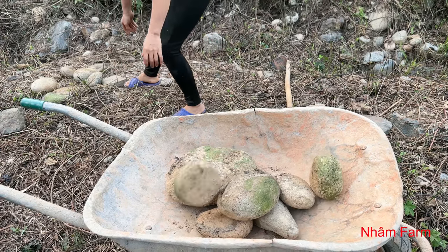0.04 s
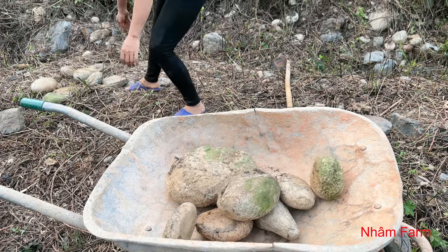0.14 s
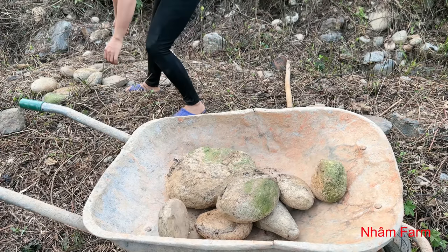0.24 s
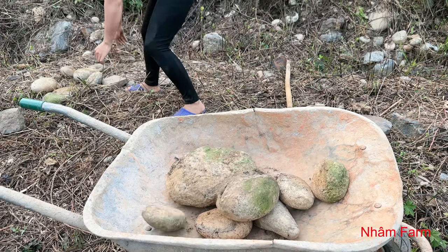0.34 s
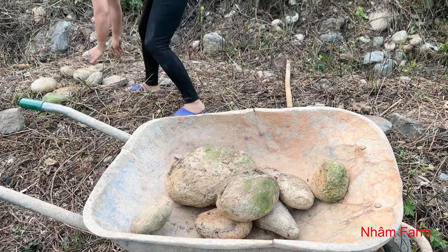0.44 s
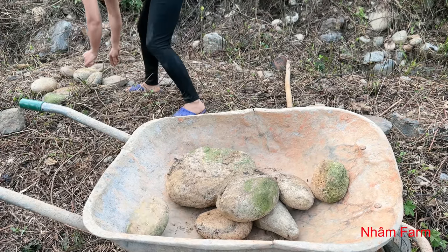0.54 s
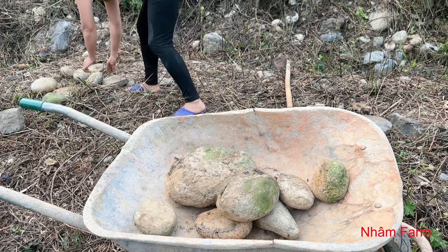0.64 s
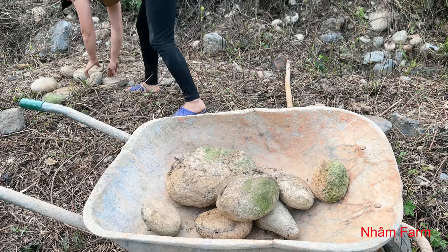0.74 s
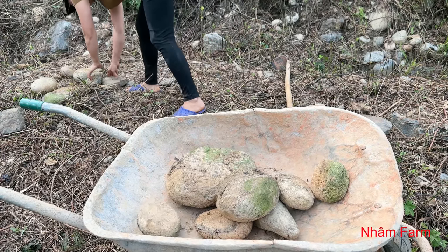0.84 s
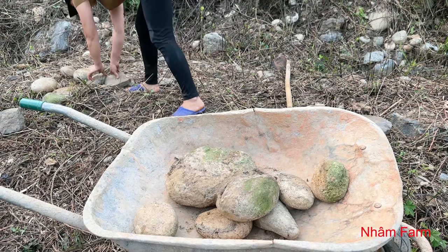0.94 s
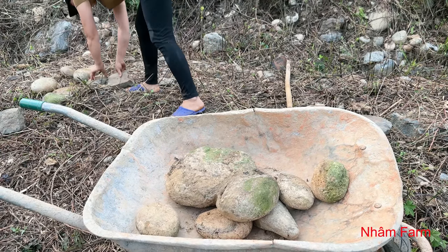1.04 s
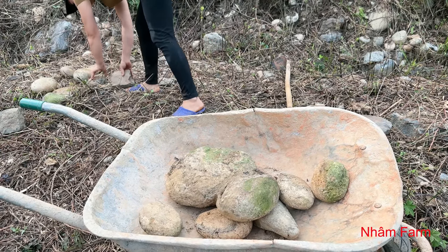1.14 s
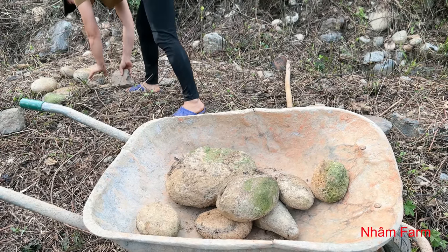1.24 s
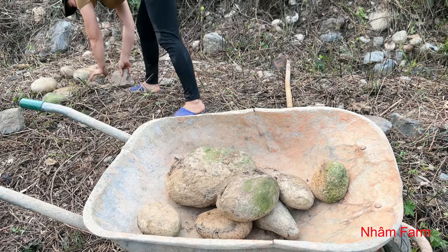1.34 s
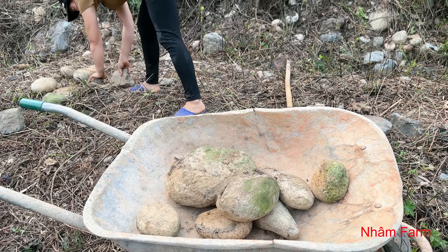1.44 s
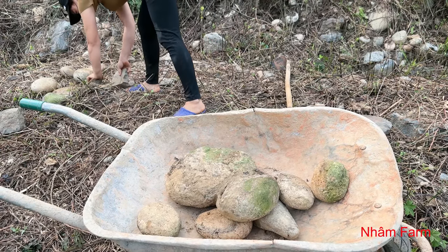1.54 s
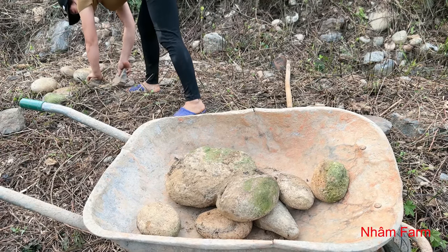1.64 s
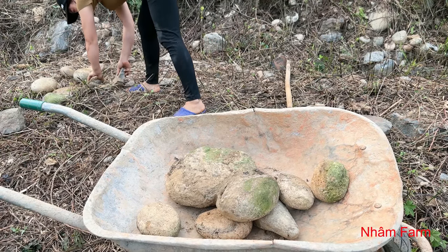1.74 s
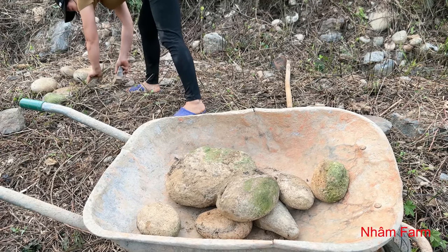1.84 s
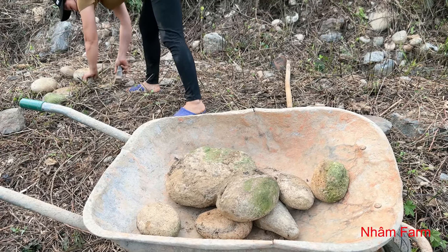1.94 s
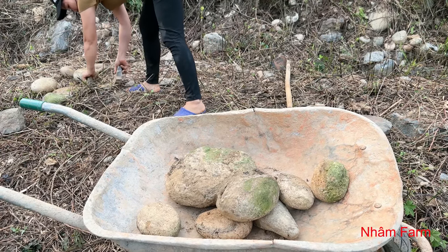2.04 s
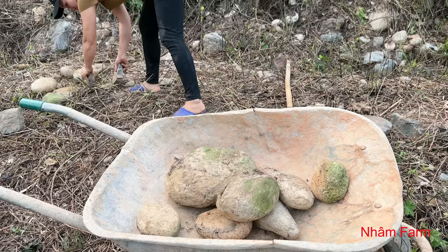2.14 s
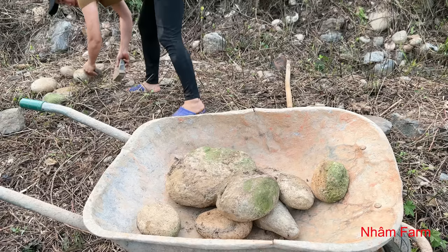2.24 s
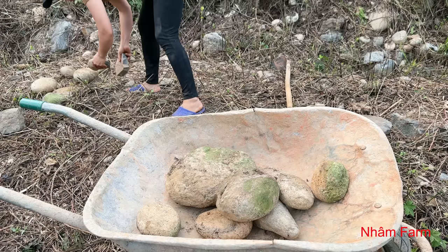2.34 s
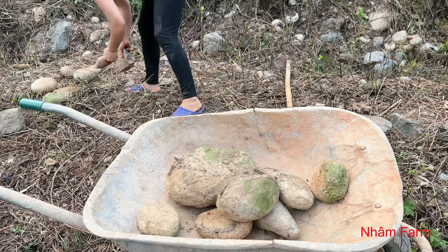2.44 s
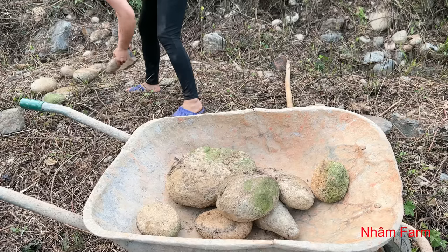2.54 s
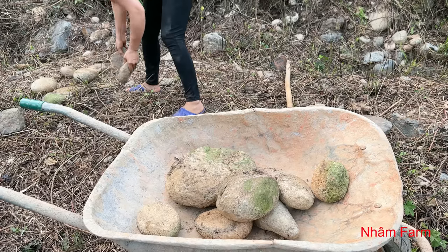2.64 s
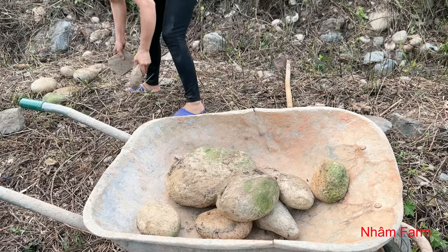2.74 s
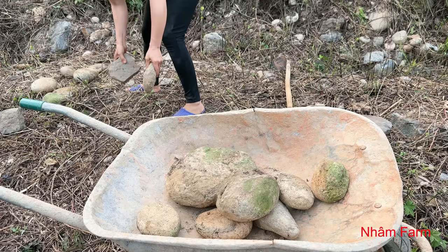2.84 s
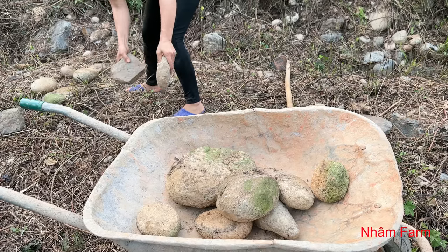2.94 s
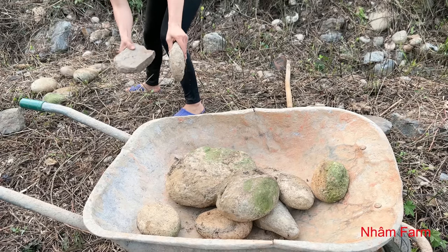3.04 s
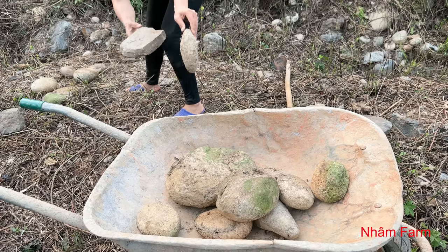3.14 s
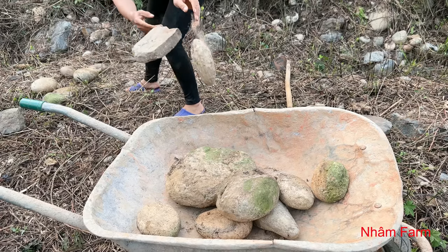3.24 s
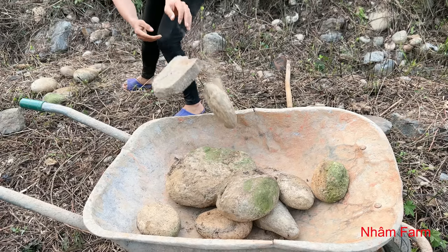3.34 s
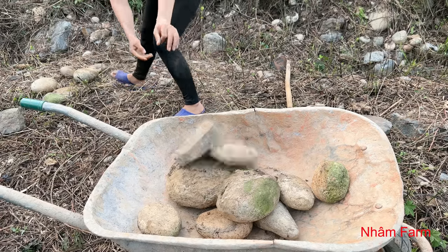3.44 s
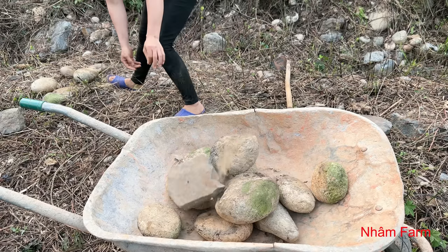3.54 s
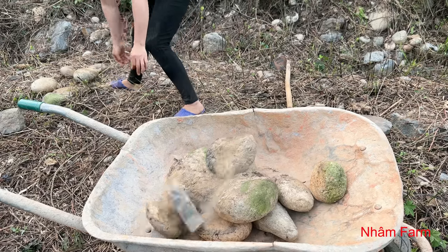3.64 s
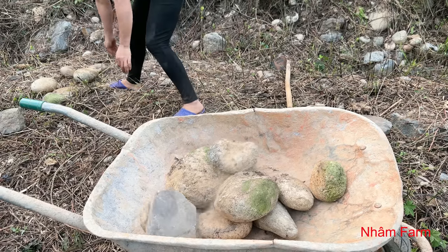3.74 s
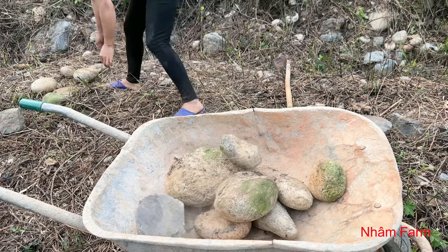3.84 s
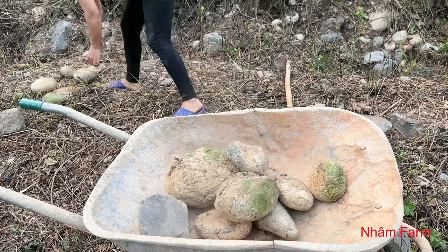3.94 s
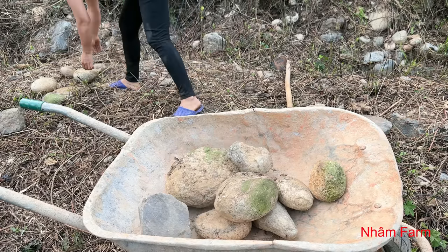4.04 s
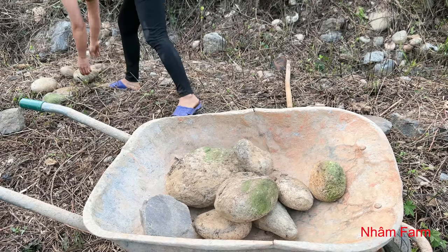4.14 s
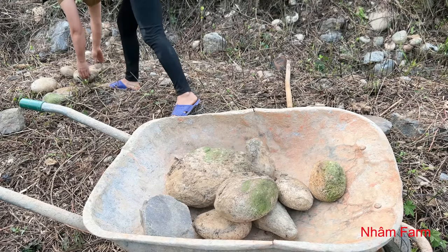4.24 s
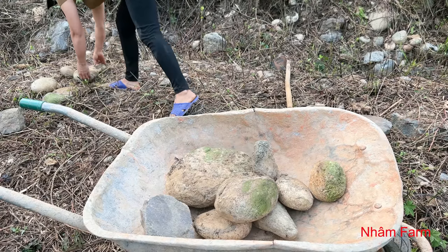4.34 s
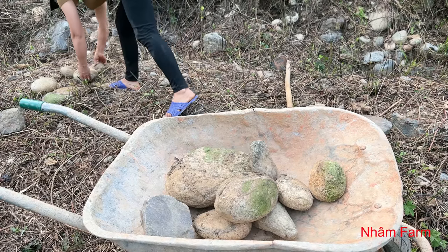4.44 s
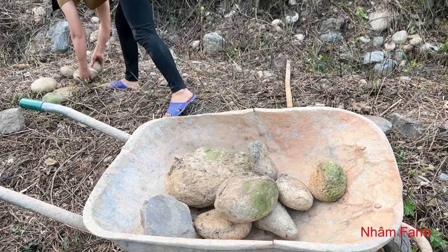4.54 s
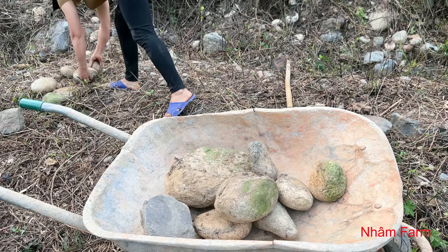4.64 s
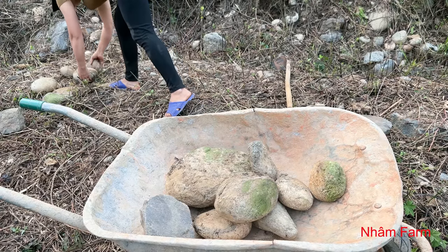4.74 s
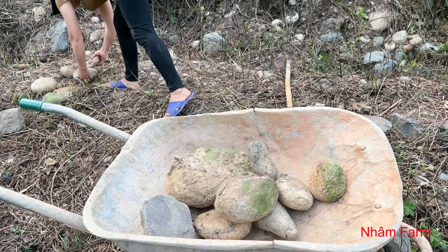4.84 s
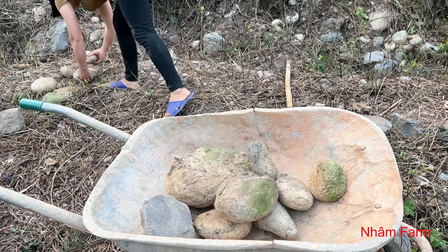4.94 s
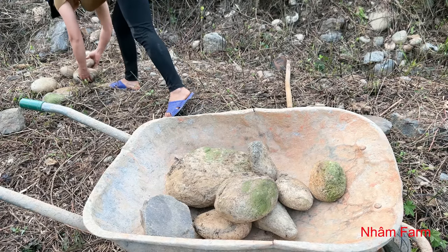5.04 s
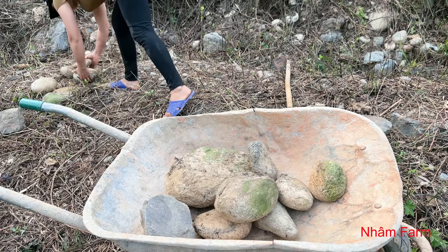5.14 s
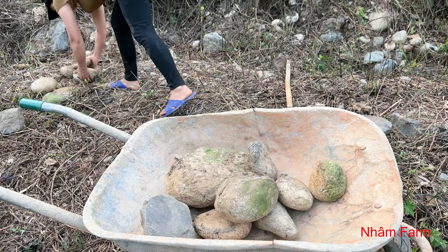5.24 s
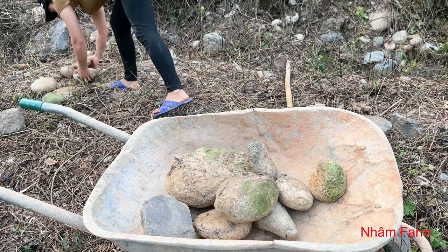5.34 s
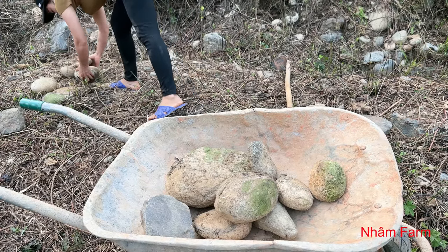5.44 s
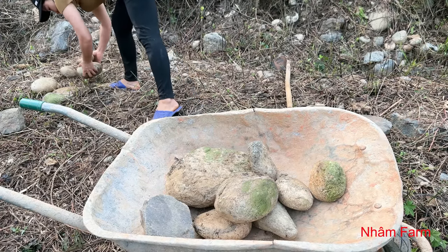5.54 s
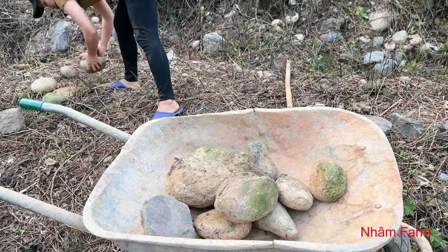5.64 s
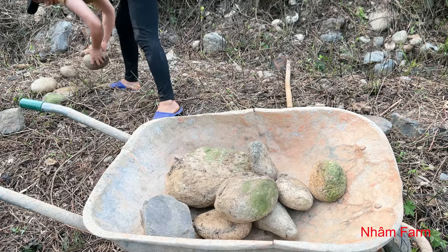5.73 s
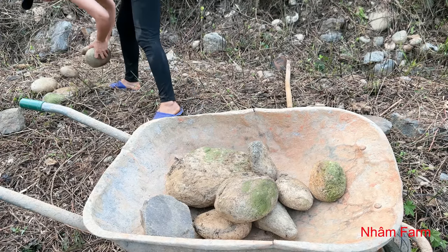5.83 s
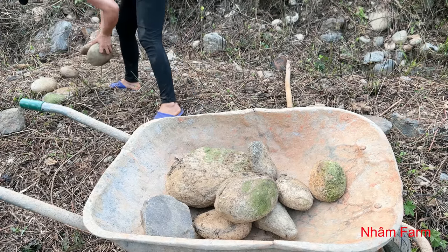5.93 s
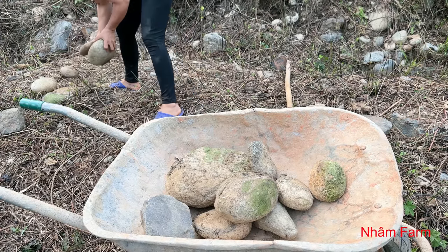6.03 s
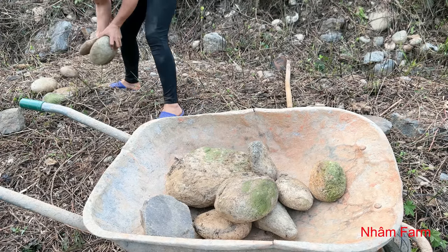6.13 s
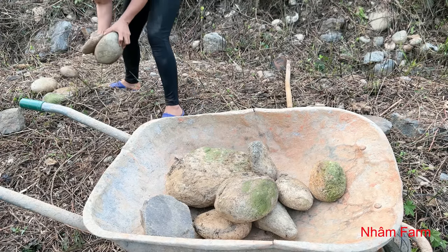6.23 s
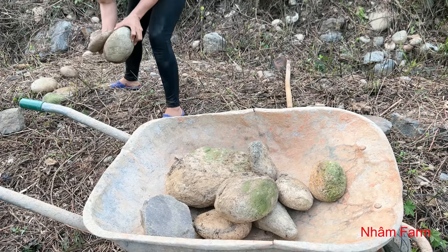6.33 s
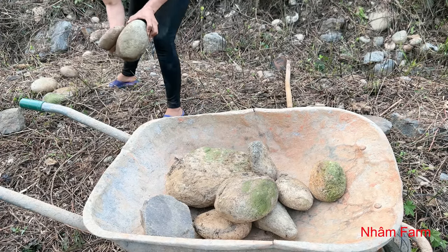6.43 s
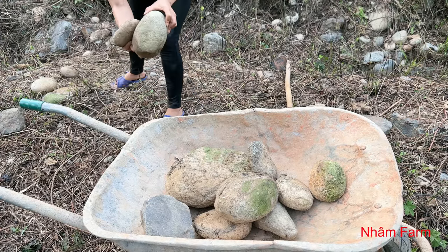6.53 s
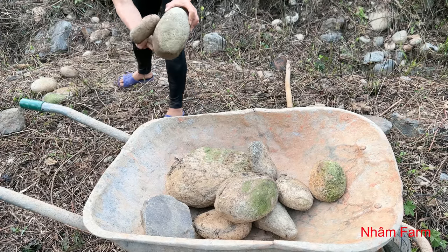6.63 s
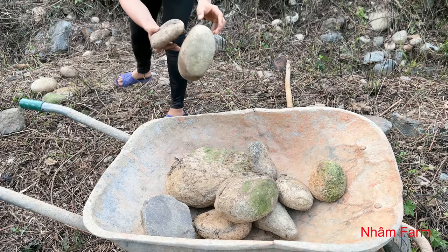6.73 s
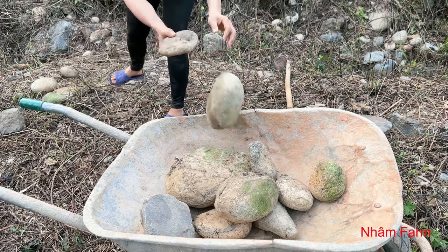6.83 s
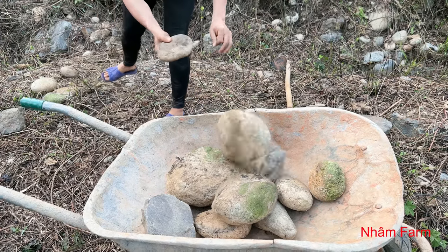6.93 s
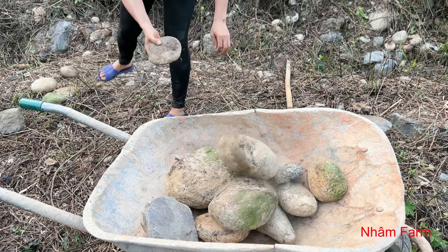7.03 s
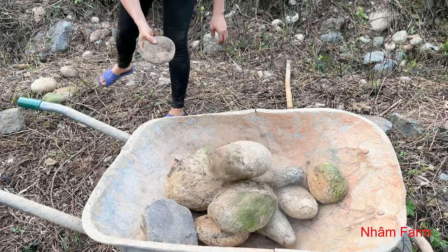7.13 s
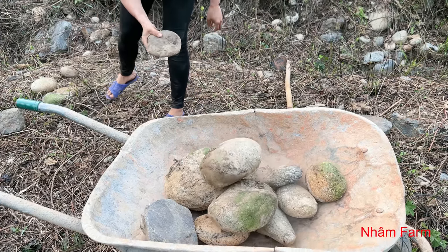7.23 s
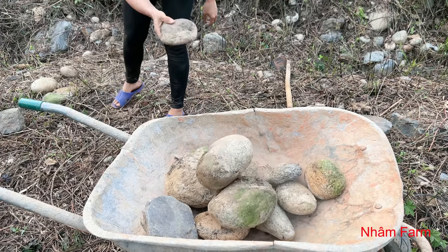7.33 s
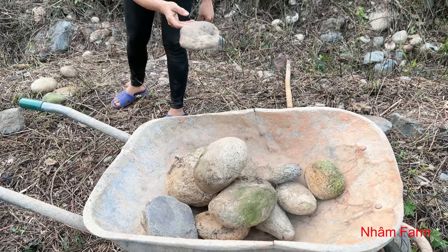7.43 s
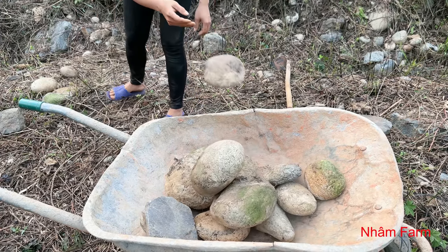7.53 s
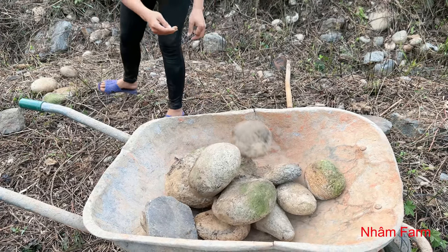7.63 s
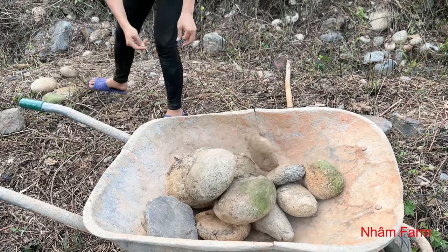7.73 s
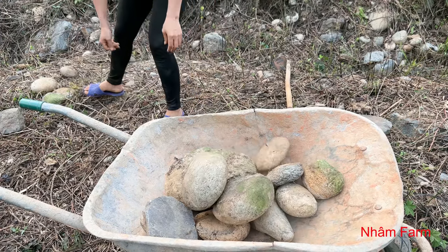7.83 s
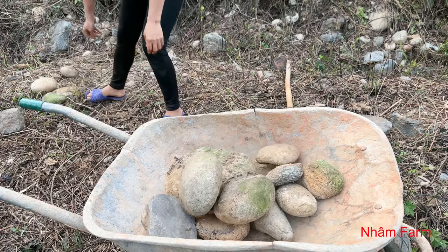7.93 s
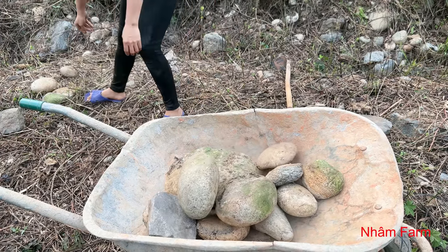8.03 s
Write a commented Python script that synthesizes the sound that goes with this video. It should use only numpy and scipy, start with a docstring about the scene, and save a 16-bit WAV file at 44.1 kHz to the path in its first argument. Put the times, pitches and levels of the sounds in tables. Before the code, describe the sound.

Outdoors, close to a sheet-metal wheelbarrow, in stereo with little echo. At 0 to 1.5 seconds a stone strikes hard near 0.2, then rocks and rolls with hollow, damped knocks, gritty scrapes and fading rattles. From 1.7 to 3.4 it is very quiet: distant low rumble, soft hiss, thin high crickets, regular nearby chirps, dry litter rustling and small snaps. At 3.4 to 4.5 the loudest crash comes: sharp stone cracks, metallic clangs, deep frame thumps, tumbling, and another knock at 4.3, leaving a faint low hum. Tiny sliding bird whistles sound around 4.7 to 5.1, a small stone taps another at 5.1, and crackling stalks follow through 6.7. At 6.85 a heavy stone lands with a boomy clank, shifts and cracks again near 7.4; another hits at 7.7, knocks at 7.85 and settles by 8.

```python
"""Stones thrown into a wheelbarrow

Heavy stones land on others in a sheet-metal wheelbarrow tray outdoors, heard by a two-port microphone.
Each knock rings damped tray modes and a pitched boom; small random contacts make the pile rattle after it.
Two-mode cracks and noise scrapes sharpen the throws. Between them: low distant rumble and hiss of shaped noise,
crackling litter, noise-click snaps, stone taps, gated-tone crickets near and far, a small bird's gliding whistles."""
import sys
import numpy as np
from scipy import signal
from scipy.fft import rfft, irfft
from scipy.io import wavfile
from scipy.ndimage import uniform_filter1d

SR = 44100
rng = np.random.default_rng(int(sys.argv[2]) if len(sys.argv) > 2 else 0)


def wav_out(sig):
    """Save sig, one row per channel (or a flat mono array), as 16-bit PCM at SR to the path in sys.argv[1]."""
    wavfile.write(sys.argv[1], SR, np.round(np.clip(np.atleast_2d(sig).T, -1, 1) * 32767).astype(np.int16))


N = 356328

# knocks of stones landing and rocking in the tray: (time [s], clang peak [dB], boom against clang [dB],
#   grit against clang [dB], boom pitch [Hz], clack pitch [Hz], clack against clang [dB], basic t60 [s],
#   rattle rms against clang [dB])
BLOWS = [(.003, -26.5, 1, -29, 266, 554.3, -1.5, 0.10217, -10),
         (.04, -34, 0, -12, 263.7, 1150, -9, 0.1013, -9),
         (.079, -37, 2.5, -5.5, 225.8, 595, -9, 0.0813, -17),
         (.172, -10.5, -5.5, -21.5, 340.4, 581.4, 1, 0.0399, -8),
         (.195, -16.5, -3.5, -30.5, 207, 871.4, 0.5, 0.1731, -6),
         (.248, -29, -20, -28, 270.1, 726, -12, 0.2233, -9),
         (.285, -36.5, -6, -16, 322.8, 603, -9, 0.0987, -10),
         (.329, -29.5, 4.5, 2.5, 158.9, 600.8, -3.5, 0.148, -12.5),
         (.352, -24.5, -15.5, -14, 322.8, 800.8, -4.5, 0.1261, -15),
         (.386, -26, -12.5, -11, 247.7, 1745, -1, 0.09024, -7.5),
         (.436, -30.5, 7.5, 5, 256.3, 775, -19, 0.07825, -14.5),
         (.484, -26.5, 0.5, -26, 269, 772.7, 0.5, 0.1141, -17.5),
         (.511, -24, 1, -19.5, 255, 790.8, -2, 0.15845, -16),
         (.613, -40, 0, -27.5, 266, 1432, -14, 0.174, -17.5),
         (.666, -23, 1, -16, 291.8, 735.4, -2.5, 0.1906, -8),
         (.769, -38.5, -5, 9, 261.1, 758, -8.5, 0.0797, -9),
         (.796, -28.5, -1, 3, 260.2, 1653, -17, 0.0682, -12),
         (.831, -30.5, -1, -38, 260.1, 605.2, -1, 0.0698, -11.5),
         (.875, -23.5, 1.5, -26, 269.1, 768, -3.5, 0.15663, -15.5),
         (.946, -34.5, -10, -29, 221, 615.9, 1, 0.1205, -10.5),
         (1.083, -35, 5.5, -27.5, 303.9, 868.1, -1, 0.09616, -7.5),
         (1.108, -35, 1.5, -15.5, 309.1, 634.7, -3, 0.2229, -14),
         (1.148, -37, -0.5, -8.5, 279.8, 879, -5, 0.10586, -14.5),
         (1.265, -43, 8, -26, 290.4, 780, -5, .15, -14), (1.279, -42, 3, -10, 300, 760, -2, 0.1181, -14),
         (1.334, -41, 4, -18, 330, 900, -3, .1, -12), (1.352, -42, 5, -20, 350, 1500, -4, .1, -12),
         (1.471, -47, 6, -26.5, 302.1, 775, -4, 0.1345, -15.5),
         (1.501, -44.5, -0.5, -29, 339.1, 773.5, 2, 0.1565, -13.5),
         (1.717, -58.5, 2, -9, 331.1, 895, -1.5, 0.1069, -13.5),
         (3.424, -21, -9.5, -15, 272.1, 852.2, -6.5, 0.1275, -6),
         (3.436, -17, -10.5, -24, 218, 596, -4.5, 0.1439, -8.5),
         (3.454, -22, -27.5, -25.5, 403, 1200, 3, 0.0821, -7.5),
         (3.476, -18.5, -17, -12, 260, 759.4, -19.5, 0.1963, -10),
         (3.485, -16.5, -17, -10, 283.2, 1450, -8.5, 0.0971, -9.5),
         (3.564, -16, -7, -14, 222.9, 596, -13, 0.05746, -11),
         (3.604, -7, -6.5, -11.5, 290.8, 583.5, -6, 0.10902, -16),
         (3.619, -13.5, -22, -32, 299.3, 721.8, -12, 0.11603, -12),
         (3.681, -29, -5.5, 1.5, 248, 603.3, -8.5, 0.0434, -13.5),
         (3.728, -20, -15.5, -4, 274.9, 1070, -5, 0.06936, -11),
         (3.759, -16.5, 1, -19.5, 257.8, 703.4, 1, 0.1491, -6),
         (3.797, -14, -6, -2.5, 291, 1154, -4.5, 0.14917, -13),
         (3.849, -32, 11, -22, 150, 692.5, -7, 0.1479, -8),
         (3.891, -28, 0, -19, 270, 599.4, 5, 0.1757, -12),
         (3.977, -35.5, -6.5, -14, 250, 1703, -4, 0.0643, -7),
         (3.988, -26, 5, -10, 159, 686, -2.5, 0.1573, -5.5),
         (4.092, -33.5, 1.5, -2, 299, 754.3, -4.5, 0.07314, -20.5),
         (4.159, -32, 5, -27.5, 197.9, 1117, -10, 0.0928, -18),
         (4.186, -34.5, 7.5, -3.5, 162.9, 1800, -4, 0.086, -12),
         (4.306, -14.5, -6, -10, 316.5, 736.7, -14, 0.13043, -10),
         (4.359, -31.5, -5.5, -1.5, 330.7, 1470, -22, 0.1466, -11.5),
         (4.472, -35, 3, -21.5, 365.9, 1417, -1, 0.07963, -14),
         (4.542, -43, 0, -18, 248, 614.3, -2.5, 0.1193, -17),
         (6.8445, -14, 7, -22.5, 349.8, 520, 6, 0.07083, -11),
         (6.859, -17.5, -1.5, -10, 445.6, 900, -7, 0.11835, -10.5),
         (6.874, -20, -18, -9, 334, 705.6, -2, 0.0853, -17),
         (6.916, -17.5, -14.5, -9.5, 400, 1461, -8.5, 0.1808, -15),
         (6.976, -30, -16.5, -39, 245, 736.4, 2.5, 0.1237, -4),
         (7.018, -22.5, -3, -4.5, 242.9, 1277, -8.5, 0.1734, -10),
         (7.07, -26, -16.5, -7, 230.9, 1174, -8.5, 0.1974, -8),
         (7.109, -26, -13, -20.5, 393.8, 803, -10, 0.06736, -14.5),
         (7.181, -29, -10, -2, 253.6, 1169, -1.5, 0.0711, -5.5),
         (7.215, -27, -4, -21, 231, 811, -13.5, 0.1669, -19.5),
         (7.315, -36, -2, -16, 260, 826.5, -11, 0.1463, -10),
         (7.369, -25, -29.5, 0.5, 311.8, 2160, -3.5, 0.1134, -9),
         (7.384, -31, -15, -8.5, 397.7, 1909, 1.5, 0.0882, -5.5),
         (7.408, -19.5, -24.5, 1, 333.9, 1597, -2.5, 0.0384, -17),
         (7.418, -17, -15, -6, 312.2, 1144, -0.5, 0.08274, -18),
         (7.566, -51, -6, 0, 330.3, 815.5, -11, 0.0912, -14.5),
         (7.679, -11.5, -21, -13.5, 167.1, 1045, -4.5, 0.04524, -10),
         (7.721, -22.5, -10, 1.5, 294.9, 900, -1.5, 0.0888, -12.5),
         (7.739, -20, -29, -8.5, 357, 676, -21.5, 0.0838, -19),
         (7.843, -17, -3, -30.5, 450.1, 891, -0.5, 0.09725, -10),
         (7.878, -23, -3, -13.5, 207.9, 868.6, -4.5, 0.16355, -9.5),
         (7.94, -37.5, -5, -21.5, 194, 843.3, 3.5, 0.1061, -5),
         (7.979, -45.5, -15.5, 11.5, 342.1, 1449, -6, 0.0858, -5.5),
         (8.015, -36.5, -3, -3.5, 197.9, 720.6, -9.5, 0.1154, -19),
         (8.039, -51, -0.5, -13, 241, 694, -11.5, 0.097, -11)]


def gain_of(db):
    """Decibels to gain."""
    return 10 ** (np.asarray(db) / 20)


def left_by(db):
    """Gains of the two ports that set left above right by db."""
    return gain_of(db * np.array([[.5], [-.5]]))


def seconds(size):
    """Time of each sample."""
    return np.arange(size) / SR


def evened(x):
    """Scales to rms 1."""
    return x / np.sqrt(np.mean(x ** 2) + 1e-30)


def coloured(x, points):
    """Filters the last axis by a (frequency [Hz], level [dB]) table, read along log frequency."""
    hz, db = np.transpose(points)
    f = np.fft.rfftfreq(x.shape[-1], 1 / SR)
    curve_db = np.interp(np.log(f + 1), np.log(hz + 1), db)
    return irfft(rfft(x) * gain_of(curve_db), x.shape[-1])


def band(x, lo_hz, hi_hz):
    """Causal band-pass."""
    return signal.sosfilt(signal.butter(2, [lo_hz, hi_hz], "bandpass", fs=SR, output="sos"), x)


def add(mix, s, sound):
    """Mixes a sound in at time s."""
    part = mix[..., round(s * SR):][..., :sound.shape[-1]]
    part += sound[..., :part.shape[-1]]


def ring(t, hz, t60):
    """A dying sine."""
    return np.exp(-np.log(1000) * t / t60) * np.sin(2 * np.pi * hz * t)


def push(t, rise_s):
    """Onset of a contact: starts flat, then rises smoothly to 1."""
    return 1 - np.exp(-(t / rise_s) ** 2)


def resonate(x, hz, width_hz):
    """Moving resonance: shifts the curve hz down to zero, smooths, and shifts back."""
    turn = np.exp(2j * np.pi * np.cumsum(hz) / SR)
    r = np.exp(-np.pi * width_hz / SR)
    return 2 * (turn * signal.lfilter([1 - r], [1, -r], x / turn)).real


def air():
    """Distant rumble and hiss: random short-time spectra with drifting patches, partly alike at both ports."""
    # likeness of the ports: (frequency [Hz], likeness from -1 to 1)
    likeness = [(60, 1), (130, 0.82), (290, -0.18), (640, -0.65), (1410, -1), (3100, 0.56), (6820, 0.55),
                (15000, 0.98585)]
    # balance of the ports: (frequency [Hz], left minus right [dB])
    balance = [(60, 2.5), (180, -3), (550, 1), (1650, 4.5), (4970, 5.5), (15000, -3.5)]
    # spectrum shape: (frequency [Hz], relative level per Hz [dB])
    spectrum = [(22, -23), (40, -7), (62, -0.5), (95, -5), (130, -11), (250, -17), (500, -14), (700, -21.5),
                (1200, -19.5), (2000, -23), (4000, -31), (5200, -19), (6600, -28.5), (7700, -25),
                (10000, -35.5), (16000, -49)]
    level_db = -66.5  # rms
    frames, hz = N // 256 + 5, np.fft.rfftfreq(1024, 1 / SR)
    a, b, c, d, patches = rng.standard_normal((frames, 513, 5)).T
    patches = evened(uniform_filter1d(uniform_filter1d(patches, 10, 0), 12, 1))
    same, left_db = (np.interp(np.log(hz + 1), np.log(np.transpose(p)[0]), np.transpose(p)[1])[:, None]
                     for p in (likeness, balance))
    same = np.clip(same, -1, 1)
    left = a + 1j * b
    right = same * left + np.sqrt(1 - same ** 2) * (c + 1j * d)
    spectra = np.array([left, right]) * gain_of(2.6 * patches + np.multiply.outer([.5, -.5], left_db))
    noise = signal.istft(spectra, nperseg=1024, noverlap=768)[1][:, :N]
    return gain_of(level_db) * evened(coloured(noise, spectrum))


def far_crickets():
    """Slightly fuzzy tones gated by regular strokes, drifting in pitch and swelling at random."""
    # (pitch [Hz], rms with its gaps [dB], pulse rate [1/s], middle of one pulse [s], share of cycle sounding)
    callers = [(7641.8, -83, 19.3, 5.903, .8), (7360.4, -88, 9.2, 5.4, .25), (7720, -85, 40, 2, .95),
               (7580, -86, 25, 2, .95)]
    out, t = np.zeros((2, N)), seconds(N)
    for hz, db, rate, s, duty in callers:
        cycle = ((t - s) * rate + .5) % 1 - .5
        gate = np.cos(np.pi * np.clip(cycle / duty, -.5, .5)) ** 2
        drift = np.cumsum(evened(uniform_filter1d(rng.standard_normal(N), 400))) * 25 / SR  # 25 Hz rms
        swell = evened(uniform_filter1d(uniform_filter1d(rng.standard_normal(N), 2000), 2000))
        tone = np.sin(2 * np.pi * (hz * t + drift) + rng.uniform(0, 1, (2, 1)))
        out += gain_of(db) * evened(gate * gain_of(2.2 * swell) * tone)
    return out * left_by(3)


def near_cricket():
    """Six wing strokes a chirp, each falling in pitch, the first ones weaker, with a short diffuse echo."""
    # reference time of each chirp, which begins 5 ms ahead of it [s]
    chirp_times = [.112, .578, .745, .902, 1.061, 1.225, 1.382, 1.543, 1.699, 1.852, 2.002, 2.163, 2.313,
                   2.468, 2.616, 2.771, 2.923, 3.073, 3.224, 3.402, 4.505, 4.655, 4.809, 4.967, 5.132,
                   5.288, 5.445, 5.601, 5.769, 5.925, 6.08, 6.231, 6.409, 6.562, 6.716]
    # loudness of the direct chirps: (time [s], rms level [dB])
    chirp_levels = [(1.2, -68), (1.55, -64.5), (4.95, -64.5), (5.2, -63), (6, -61.5)]
    strokes_per_s = 81
    out, t = np.zeros(N), seconds(440)
    for s, db in zip(chirp_times, np.interp(chirp_times, *np.transpose(chirp_levels))):
        chirp = np.zeros(round(6 * SR / strokes_per_s))
        for k, (wobble, phase, strength) in enumerate(rng.standard_normal((6, 3))):
            hz = np.linspace(5920, 4560, len(t)) * (1 + .009 * wobble)
            stroke = np.hanning(len(t)) * np.sin(2 * np.pi * np.cumsum(hz) / SR + 3 * phase)
            add(chirp, k / strokes_per_s, gain_of(strength - 2.5 * np.exp(-k / 1.2)) * stroke)
        add(out, s - .005, gain_of(db) * evened(chirp))
    tail = band(rng.standard_normal((2, 4000)), 4000, 6140) * gain_of(-60 * seconds(4000) / 0.07)
    echo = signal.oaconvolve(out[None], tail / np.linalg.norm(tail[0]), axes=1)[:, :N]
    return out * left_by(1) + gain_of(-15.5) * echo


def bird():
    """Whistles that slide ever faster."""
    # (time [s], rms level before panning [dB], start pitch [Hz], end pitch [Hz], length [s])
    whistles = [(4.66, -71, 4400, 5600, 0.03409), (4.708, -73, 5500, 3800, .035),
                (4.755, -70, 4350, 5500, 0.03595), (4.853, -68, 4350, 5600, 0.03803),
                (4.953, -67.5, 4400, 5500, .035), (5.051, -68.5, 4400, 5900, 0.04144)]
    out = np.zeros(N)
    for s, db, start_hz, end_hz, length in whistles:
        hz = start_hz + (end_hz - start_hz) * np.linspace(0, 1, round(length * SR)) ** 1.2
        whistle = np.sqrt(np.hanning(len(hz))) * np.sin(2 * np.pi * np.cumsum(hz) / SR)
        add(out, s, gain_of(db) * evened(whistle))
    return out * left_by(2)


def rustle():
    """Clumped crackles of dry stalks, dull and bright, swelling and fading with each stir."""
    # feet and hands stirring dry litter: (time of the height [s], rise per 20 dB [s], fall per 20 dB [s],
    #   dull rms at the left [dB], bright rms [dB])
    stirs = [(1.584, 0.06452, 0.1864, -76, -67), (1.838, 0.05937, 0.3255, -75.5, -73.5),
             (2.16, .06, 0.0037, -79, -65.5), (2.398, 0.0499, 0.133, -74, -75.5),
             (2.94, 0.149, 0.4472, -76.5, -95), (3.15, 0.0976, 0.17, -79, -77),
             (5.068, 0.004016, 0.0487, -60, -100), (5.37, 0.1143, 1.2415, -70.5, -72),
             (6.24, 0.019623, 0.2831, -71, -67.5), (6.59, 0.1454, 0.2876, -75, -63),
             (6.8, .04, 1.27, -77, -83.5)]
    power, t = np.zeros((2, N)), seconds(N)
    for s, rise, fall, dull_db, bright_db in stirs:
        shape_db = -20 * np.maximum((s - t) / rise, (t - s) / fall)
        power += gain_of(np.array([[dull_db], [bright_db]]) + shape_db) ** 2
    # about 2500 crackles a second of uneven size and sign
    grains = gain_of(2.5 * np.minimum(rng.exponential(1, (2, N)), 4)) * (rng.random((2, N)) < 2500 / SR)
    grains *= rng.standard_normal((2, N))
    dull = evened(band(band(grains, 760, 2500), 600, 3000)) * gain_of([[0.], [-4.]])
    bright = evened(band(grains + .3 * rng.standard_normal((2, N)), 5000, 19000))
    return np.sqrt(power[0]) * dull + np.sqrt(power[1]) * bright


def snaps():
    """Noise clicks ringing a broad resonance with a scatter of litter after them, each with a bright tick."""
    # small knocks and snaps in the litter: (time [s], body peak before panning [dB], pitch [Hz],
    #   spread factor, bright tick peak before panning [dB], left minus right [dB])
    placed = [(1.405, -57, 3000, 1.3, -75, 3), (1.556, -55, 2900, 1.3, -72, 3),
              (1.659, -63, 2865, 1.09, -69, -1), (1.849, -62, 2664, 1.601, -73, 2),
              (2.088, -61.5, 2796, 1.1554, -80, 3.5), (2.428, -61, 2995, 1.2667, -80, 4),
              (2.494, -63, 1801, 1.1586, -85, 4), (2.753, -50.5, 2730, 1.1176, -78.5, 7),
              (2.899, -59.5, 2260, 1.659, -79, 6), (2.924, -56.5, 2106, 1.1964, -83, 6.5),
              (3.055, -62, 2405, 1.2053, -85, 5.5), (3.248, -60.5, 2397, 1.203, -80, 5),
              (3.32, -53, 2782, 1.7, -71, 5), (4.766, -59, 2599, 1.413, -87, 7),
              (4.959, -64, 2330, 1.271, -76, 5), (5.384, -55, 1646, 1.764, -46.5, -.5),
              (5.725, -59, 2158, 1.706, -78.5, 3), (5.789, -61, 4205, 1.258, -77.5, 10),
              (6.235, -55, 2528, 1.1364, -69, -5), (6.599, -63, 2010, 1.497, -77, 5)]
    t60_s, tail_db, tail_t60_s = .026, -18, .12
    faint_count, faint_db, lo_hz, hi_hz = 160, -64, 1200, 3600
    out, t = np.zeros((2, N)), seconds(4096)
    when, size, pitch, pan = rng.random((faint_count, 4)).T
    # faint snaps at random moments, up to 8 dB weaker and up to 8 dB to the left
    faint = [(s * N / SR, faint_db - 8 * a, lo_hz * (hi_hz / lo_hz) ** b, 1.3, faint_db - 14, 8 * c)
             for s, a, b, c in zip(when, size, pitch, pan)]
    dying = gain_of(-60 * t / t60_s) + gain_of(tail_db - 60 * t / tail_t60_s)
    for s, db, hz, spread, tick_db, pan_db in [*placed, *faint]:
        click = rng.standard_normal(len(t)) * dying
        click[:3] += 12  # the first contact is a compact push
        lowest_hz, highest_hz = hz / spread ** 1.2, hz * spread
        body = band(band(click, lowest_hz, highest_hz), lowest_hz, highest_hz)
        tick = band(click, 4500, 12000)
        x = gain_of(db) * body / abs(body).max() + gain_of(tick_db) * tick / abs(tick).max()
        add(out, s, left_by(pan_db) * x)
    return out


def toks():
    """A small stone tapping another on the ground: a soft contact ringing a few low modes."""
    # (time [s], peak before panning [dB], pitch [Hz], left minus right [dB])
    taps = [(5.0606, -35, 851.3, 7.5), (5.109, -50, 760.5, 7.5), (5.219, -62.5, 717.5, 3.5)]
    # modes of the tapped stones: (pitch ratio, level [dB], t60 [s])
    tap_modes = [(.62, -6.5, 0.01957), (1, -0.5, 0.01675), (1.4, -6, 0.01534), (1.9, -8, .01),
                 (2.5, -8, 0.010176)]
    out, t = np.zeros((2, N)), seconds(2048)
    for s, db, hz, pan_db in taps:
        modes = sum(gain_of(mode_db) * ring(t, ratio * hz, t60) for ratio, mode_db, t60 in tap_modes)
        x = push(t, 0.0009306) * modes
        add(out, s, left_by(pan_db) * gain_of(db) * x / abs(x).max())
    return out


def scrapes():
    """Grit crushed or scraped between stone and sheet: short bright bursts of noise, as mid and side."""
    # (time [s], bright peak [dB], duller part against bright [dB])
    bursts = [(0.0374, -46, -3), (0.0565, -43, -3), (0.0746, -44, -3), (0.171, -26.5, -3),
              (0.2148, -26, -3), (0.2659, -41.5, -3), (0.283, -38.5, -3), (0.3302, -29, -3),
              (0.3447, -32, -3), (0.365, -38.5, -3), (0.387, -39, -3), (0.4379, -32, -3), (0.5075, -50, -3),
              (0.673, -43, -3), (0.6932, -44.5, -3), (0.7357, -54, -3), (0.7668, -35, -3),
              (0.7854, -33, -3), (0.7974, -37, -3), (0.8074, -49.5, -3), (0.8736, -56, -3),
              (0.9071, -55, -3), (0.9513, -47, -3), (1.1187, -52.5, -3), (1.1473, -47, -3),
              (3.4292, -30.5, -3), (3.4447, -25, -3), (3.475, -25, -3), (3.5017, -25.5, -3),
              (3.5533, -29.5, -3), (3.5772, -26, -3), (3.6032, -27.5, -3), (3.62, -24.5, -3),
              (3.6454, -28, -3), (3.6816, -29, -3), (3.7185, -31.5, -3), (3.7304, -28.5, -3),
              (3.7565, -31.5, -3), (3.7978, -26, -3), (3.9771, -38, -3), (3.9886, -36.5, -3),
              (4.0924, -44.5, -3), (4.1858, -39.5, -3), (4.3056, -38.5, -3), (4.3184, -35.5, -3),
              (4.362, -41, -3), (6.8441, -29, -3), (6.9196, -35, -3), (6.9515, -34.5, -3),
              (7.0174, -30, -3), (7.0264, -29.5, -3), (7.0687, -35, -3), (7.1027, -35, -3),
              (7.181, -40, -3), (7.2233, -41.5, -3), (7.3518, -36.5, -3), (7.3696, -31, -3),
              (7.3839, -32, -3), (7.4075, -31, -3), (7.416, -24.5, -3), (7.457, -47.5, -3),
              (7.6806, -30, -3), (7.7207, -32, -3), (7.7386, -27, -3), (7.8724, -43, -3), (7.9647, -49, -3),
              (7.9786, -41, -3), (8.0162, -43.5, -3)]
    rise_s, t60_s = .0025, .045
    out, t = np.zeros((2, N)), seconds(4096)
    shape = push(t, rise_s) * gain_of(-60 * t / t60_s)
    for s, db, dull_db in bursts:
        noise = shape * rng.standard_normal((2, len(t)))
        bright, dull = band(noise, 5200, 21000), band(noise, 3000, 5300)
        add(out, s, gain_of(db) * (bright / abs(bright[0]).max() + gain_of(dull_db) * dull / abs(dull[0]).max()))
    return out


def cracks():
    """Bare stone on bare stone, hard and very short: two quickly dying modes for each pair."""
    # (time [s], peak before panning [dB], pitch [Hz], second pitch [Hz], t60 [s], left minus right [dB])
    pairs = [(.0554, -35.5, 2169, 1348, 0.01463, -4), (.1735, -17.5, 1955, 1353, 0.01475, -4),
             (.19, -20, 1350, 800, .02, -2), (.205, -19, 1091, 1709, 0.01878, 3.5),
             (.3521, -29.5, 1446, 801, 0.01984, -2.5), (.387, -23.5, 1746, 2500, 0.01346, -4),
             (0.4381, -32, 2893, 2097, 0.01487, -2), (.4828, -30, 1439, 772, 0.02658, -3),
             (.5112, -32.5, 1390, 1744, 0.02945, -2), (.7677, -36, 3182, 4315, 0.01647, -2),
             (.794, -32, 1899, 2901, 0.01722, -3.5), (0.8048, -31, 1682, 2300, 0.02203, -3),
             (.8755, -32, 780, 1400, .025, -2), (0.9085, -38, 3304, 1320, 0.01203, -.5),
             (3.4305, -21, 1481, 2702, 0.013685, -3.5), (3.4565, -13, 1190, 2111, 0.01476, -2),
             (3.4761, -13.5, 950.5, 1694, 0.01314, -1), (3.4865, -7.5, 1649, 2589, 0.01134, -.5),
             (3.5666, -17.5, 2016, 1500, 0.01418, -5), (3.6032, -13.5, 1461, 2300, 0.01438, -1.5),
             (3.6214, -19.5, 1216, 1902, 0.0162, -1.5), (3.7983, -17.5, 1108, 2192, 0.01339, -2.5),
             (3.9885, -29.5, 1746, 2088, 0.01687, -4.5), (4.0935, -36, 1500, 3600, .016, -2),
             (4.1875, -36, 1750, 2550, .025, -2), (4.306, -21, 1480, 2061, 0.01587, -4.5),
             (6.8744, -15, 1812, 900, 0.007882, -3.5), (6.9167, -15.5, 1511, 2300, 0.01056, -2.5),
             (6.9264, -20.5, 1493, 4007, 0.01587, -3), (7.0074, -18, 2856, 1342, 0.00779, -5),
             (7.3328, -34, 1101, 2300, 0.0255, -4), (7.3692, -16, 2171, 1591, 0.0251, -3.5),
             (7.3885, -22.5, 1677, 2211, 0.0282, -4.5), (7.4165, -14, 2222, 1114, 0.01868, -3),
             (7.4225, -17.5, 1147, 1600, 0.0292, -.5), (7.431, -20.5, 1810, 1002, 0.03394, -1),
             (7.4594, -35, 1378, 1601, 0.02906, -2), (7.679, -11.5, 1404, 2219, 0.01308, -5.5),
             (7.709, -23, 1050, 1350, .016, -2), (7.7211, -24, 1809, 1359, 0.0137, -2.5),
             (7.8419, -19.5, 1069, 458.6, 0.02274, -5)]
    contact_s, second_db = 0.00079, -4
    out, t = np.zeros((2, N)), seconds(2048)
    for s, db, hz, second_hz, t60, pan_db in pairs:
        x = push(t, contact_s) * (ring(t, hz, t60) + gain_of(second_db) * ring(t, second_hz, t60))
        add(out, s, left_by(pan_db) * gain_of(db) * x / abs(x).max())
    return out


def tray_ring(t60, size, dense_db):
    """Response to one contact, as mid and side: a random share of each mode over the crowded small modes."""
    # modes of the loaded tray: (frequency [Hz], relative level [dB], relative ring time)
    tray_modes = [(85.94, -12, 0.12), (114.47, -15.5, 0.24), (152.83, -11, 0.4), (196.21, -11, 0.42),
                  (245, 1, 0.34), (324.57, 3, 0.28), (448.42, 4, 0.22), (524.26, -1, .15), (596, -1, 0.055),
                  (706.58, -5.5, 0.078), (775, -4.5, .2), (873.7, -2, 0.13), (1070, -3, 0.14),
                  (1325.1, -4, 0.11), (1443.1, -4.5, 0.21), (1714.1, -6.5, 0.2), (1889.7, -9, .12),
                  (2160, -10, 0.051), (2300, -16.5, 0.032), (2730, -15, 0.079), (3096.9, -17.5, 0.093),
                  (3358.2, -19, 0.099), (3742.4, -19, .12), (4151.5, -22, .1), (4532.8, -23, .1)]
    # crowded small modes: (frequency [Hz], relative level per Hz [dB])
    crowded_modes = [(40, -38), (80, -14.5), (150, -1), (260, 7), (450, -3), (700, -9), (1450, -13.5),
                     (2200, -16), (3200, -25), (5000, -30.5), (9500, -38), (12000, -41), (15700, -37.5),
                     (16600, -62)]
    t = seconds(size)
    hz, db, own_t60 = np.transpose(tray_modes)[:, :, None]
    share, detune, damp = rng.standard_normal((3, 2, len(tray_modes), 1))
    # the stones lying in the tray damp and detune every mode
    mode_t60 = 2.7 * own_t60 * t60 * np.exp(.5 * np.tanh(damp))
    modes = share * gain_of(db) * ring(t, hz * (1 + .035 * detune), mode_t60)
    dense = evened(coloured(rng.standard_normal((2, size)), crowded_modes))
    soft = np.sin(np.pi / 2 * np.minimum(t / .0006, 1)) ** 2
    return soft * (modes.sum(1) + gain_of(dense_db - 60 * t / t60) * dense)


def three_bands(x):
    """Boom, clang and grit ranges, each filtered twice so that neighbours add in phase."""
    ranges_hz = (48, 400), (400, 3700), (3000, 20000)
    return (band(band(x, lo_hz, hi_hz), lo_hz, hi_hz) for lo_hz, hi_hz in ranges_hz)


def rolling():
    """Power of boom, clang and grit while the stones roll and grind on between blows."""
    # one table a throw: (time [s], boom rms [dB], clang rms [dB], grit rms [dB])
    throws = [
        [(0, -30.5, -35.5, -58.5), (.084, -39, -43.5, -48.5), (.156, -47, -55, -73.5),
         (.22, -38.5, -28.5, -39.5), (.342, -38, -36.5, -52.5), (.396, -37.5, -35, -53.5),
         (.46, -42.5, -40.5, -59), (.53, -39, -43.5, -56.5), (.582, -47, -57.5, -83), (.648, -46, -57, -88.5),
         (.72, -44.5, -41, -58), (.83, -45.5, -42, -63), (.916, -42, -40, -58), (.992, -46, -52, -90),
         (1.068, -67.5, -78.5, -89.5)],
        [(3.43, -35, -31, -39.5), (3.549, -33.5, -29, -41.5), (3.697, -44, -36, -51.5),
         (3.769, -29, -28, -40.5), (3.867, -33.5, -35, -47.5), (3.931, -39.5, -41, -60.5),
         (3.969, -37.5, -54, -62), (4.05, -41.5, -51.5, -75.5), (4.217, -46.5, -51, -80.5),
         (4.289, -43.5, -59.5, -73), (4.44, -44, -54.5, -75), (4.641, -60, -78.5, -88.5)],
        [(6.87, -36.5, -30, -42.5), (7.013, -35, -33.5, -44.5), (7.119, -43, -38, -46),
         (7.161, -43.5, -45.5, -70.5), (7.22, -41.5, -42.5, -60.5), (7.3, -42.5, -54, -74),
         (7.362, -41.5, -46.5, -60), (7.378, -43.5, -42, -43), (7.473, -46.5, -51.5, -63.5),
         (7.607, -58.5, -67, -85), (7.669, -55.5, -58.5, -74.5), (7.751, -38.5, -37.5, -47.5),
         (7.831, -51, -51.5, -76.5), (7.885, -34, -34, -51.5), (8.08, -56.5, -65, -70.5)],
    ]
    power, t = np.zeros((3, N)), seconds(N)
    for table in throws:
        s, *levels_db = np.transpose(table)
        power += [gain_of(np.interp(t, s, db, left=-150, right=-150)) ** 2 for db in levels_db]
    return power


def shaking():
    """Every blow shakes the pile, which answers a little late and settles: gains of boom, clang and grit."""
    # boom, clang, grit: (level against rattle [dB], slope over loud_db [dB per dB of rattle], t60 [s])
    rattle_bands = [(0.5, -0.0535, 0.36), (-0.5, 0, .22), (-14.5, 0.549, 0.13)]
    rise_s = .006
    loud_db = -28  # a rattle below this is deeper and duller
    boom_share = .35  # of a blow's boom dB kept by its rattle: stone on stone barely shakes the floor
    power, t = np.zeros((3, N)), seconds(SR // 2)
    band_db, slope, t60 = np.transpose(rattle_bands)[:, :, None]
    for s, db, boom_db, *_, rattle_db in BLOWS:
        start_db = db + rattle_db + band_db + slope * (db + rattle_db - loud_db)
        start_db[0] += boom_share * boom_db
        add(power, s, (push(t, rise_s) * gain_of(start_db - 60 * t / t60)) ** 2)
    return np.sqrt(power + rolling())


def rattle():
    """Many uneven small contacts keep the floor humming, their ringing colour renewed at random."""
    colours, colour_step = 6, 3000  # tray responses in use at once; samples until one gives way to a new one
    size = gain_of(2.8 * np.minimum(rng.exponential(1, N), 3)) * (rng.random(N) < 1000 / SR)  # 1000 a second
    colour, sign = rng.integers(0, colours, N), rng.choice([-1., 1.], N)
    x = np.zeros((2, N))
    for k in range(1 - colours, N // colour_step + 1):
        span = slice(max(k, 0) * colour_step, (k + colours) * colour_step)
        contacts = size[span] * (colour[span] == k % colours)
        response = tray_ring(0.07, size=2048, dense_db=6)
        add(x, span.start / SR, signal.oaconvolve(contacts[None], response, axes=1))
    s, _, _, _, boom_hz, *_ = np.transpose(BLOWS)
    pitch_wander = np.tanh(evened(uniform_filter1d(rng.standard_normal(N), 1500)))
    floor_hz = np.interp(seconds(N), s, boom_hz) * (1 + .08 * pitch_wander)
    boom, clang, grit = (evened(p) for p in three_bands(x))
    hum = evened(resonate(resonate(size * sign, floor_hz, 70), floor_hz, 70))
    thud = evened(band(boom, 55, 210))  # the frame and wheel take the weight
    boom = 0.71886 * boom + 0.54 * hum * np.array([[1], [.3]]) + .25 * thud
    # grit crackles: fewer, sharper slips that die in a few milliseconds
    slips = gain_of(6 * np.minimum(rng.exponential(1, N), 3)) * (rng.random(N) < 160 / SR)
    crackle = signal.oaconvolve(slips, np.exp(-seconds(2048) / 0.0057))[:N]
    clang, grit = evened(clang * (1 + 0.16 * crackle)), evened(grit * (1 + .5 * crackle))
    boom_gain, clang_gain, grit_gain = shaking()
    return boom_gain * boom + clang_gain * clang + grit_gain * grit


def panel():
    """A free panel of the tray rings on after the pile settles: one slow-rising mode, mid only."""
    # (time [s], level before rise and decay [dB], pitch [Hz], t60 [s])
    s, db, hz, t60 = (4.57, -57, 192, .8)
    out, t = np.zeros((2, N)), seconds(SR)
    add(out[0], s, gain_of(db) * np.minimum(t / 0.0327, 1) * ring(t, hz, t60))
    return out


def thumps():
    """Low dying thumps of the frame under some blows: one mode each, mid only."""
    # (time [s], level before rise and decay [dB], pitch [Hz], t60 [s])
    frame_thumps = [(3.428, -31.5, 91.5, 0.3676), (3.61, -33.5, 98.89, 0.302), (3.759, -28, 88.15, 0.4124),
                    (3.988, -34, 80.49, 0.3264), (4.306, -32.5, 92.21, 0.3623),
                    (7.68, -29.5, 85.86, 0.3893)]
    out, t = np.zeros((2, N)), seconds(SR)
    for s, db, hz, t60 in frame_thumps:
        add(out[0], s, gain_of(db) * np.minimum(t / 0.0099, 1) * ring(t, hz, t60))
    return out


def blows():
    """Each knock of a stone rings the tray, with its own boom pitch and a brief clack of the stones."""
    out, t = np.zeros((2, N)), seconds(8192)
    for s, db, boom_db, grit_db, boom_hz, clack_hz, clack_db, t60, _ in BLOWS:
        rise_s = .0018 * gain_of(-.3 * (db + 20))  # gentle contacts are slower
        parts = three_bands((1 - np.exp(-t / rise_s)) * tray_ring(t60, size=len(t), dense_db=8))
        boom, clang, grit = (p / abs(p[0]).max() for p in parts)
        floor = push(t, .003) * ring(t, boom_hz, 1.15 * t60) * [[1], [.3]]
        boom = .32 * boom + .9 * floor
        clack = ring(t, clack_hz, .025) + .5 * ring(t, .74 * clack_hz, .025)
        clang = clang + gain_of(clack_db) * clack
        grit = (1 - np.exp(-t / 0.0027)) * gain_of(-1.5 - 550 * t) * grit
        add(out, s, gain_of(db) * (clang + gain_of(boom_db) * boom + gain_of(grit_db) * grit))
    return out


def stones():
    """All tray sounds, mid and side to left and right; part of the side is the mid turned a quarter cycle."""
    # weight of the whole side: (frequency [Hz], level [dB])
    side_level = [(60, -25), (130, -35), (290, -20.5), (640, -8.5), (1410, -6.5), (3100, 0.5), (6820, 0.5),
                  (10000, 0), (15000, -5)]
    # part of the side unrelated to the mid: (frequency [Hz], level [dB])
    side_own = [(1500, 0), (4000, -.3), (8000, -2), (15000, -5)]
    # part of the side that is the turned mid: (frequency [Hz], level [dB])
    side_turned = [(1500, -20), (4000, -12), (8000, -5), (15000, -2)]
    # slant of the ports: (frequency [Hz], left minus right [dB])
    port_slant = [(60, 0.0), (120, 0.0), (240, -0.5), (480, -0.5), (950, 0.0), (1890, -3.5), (3770, -1.0),
                  (7520, -0.5), (15000, 0.0)]
    tray = blows() + panel() + thumps() + rattle() + scrapes()
    mid, side = band(tray, 58, 20000)  # keeps the tray sounds above about 58 Hz
    turned = irfft(-1j * rfft(mid), N)
    side = coloured(coloured(side, side_own) + coloured(turned, side_turned), side_level)
    return np.array([coloured(mid + k * side, [(hz, k * db / 2) for hz, db in port_slant]) for k in (1, -1)])


def scene():
    """All sources at the two ports."""
    background = air() + far_crickets() + near_cricket() + bird() + rustle() + snaps() + toks()
    return background + cracks() + stones()


def record(dry):
    """The band limit: a steep low-pass at 16300 Hz."""
    lowpass = signal.firwin(511, 16300, window=("kaiser", 9), fs=SR)
    return signal.oaconvolve(dry, lowpass[None], "same")


dry = scene()
out = record(dry)
wav_out(out)
```